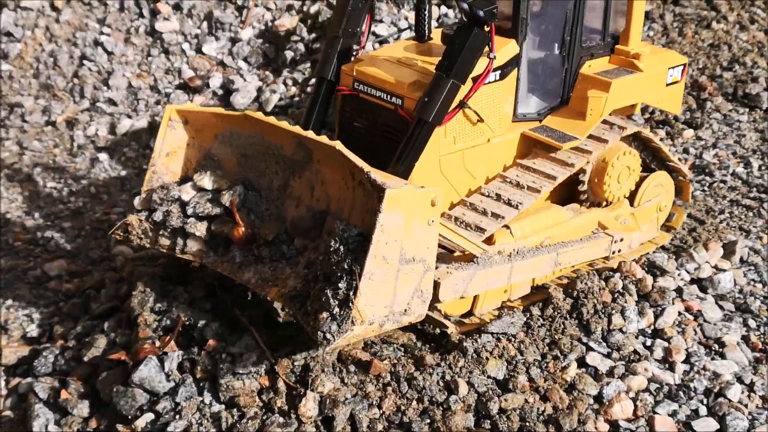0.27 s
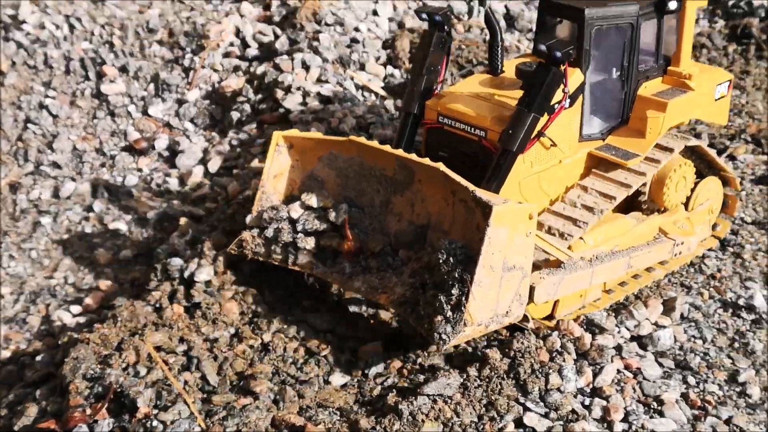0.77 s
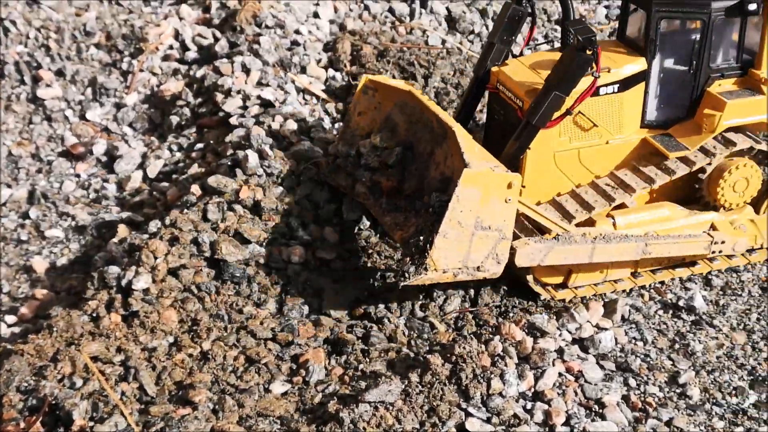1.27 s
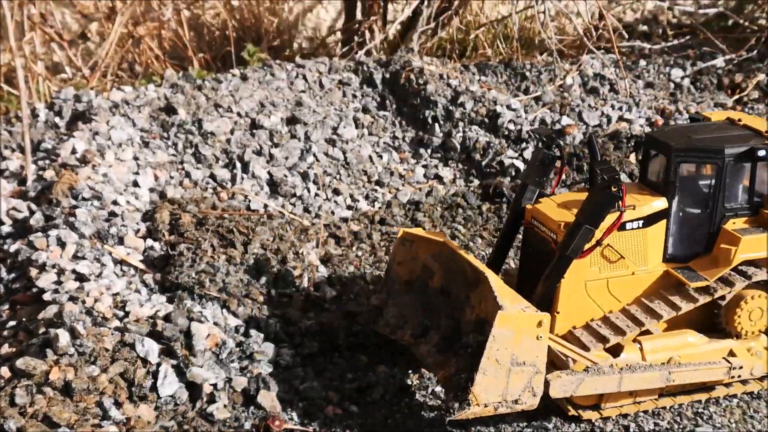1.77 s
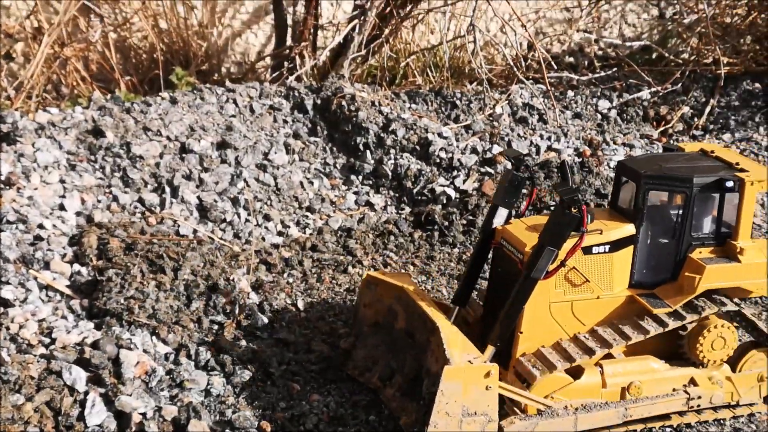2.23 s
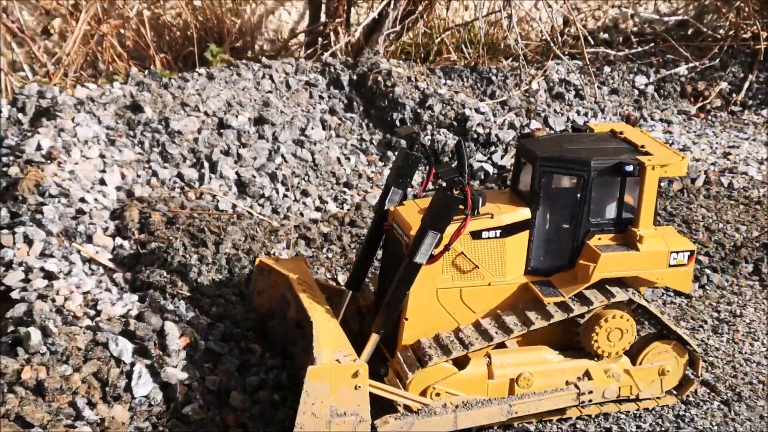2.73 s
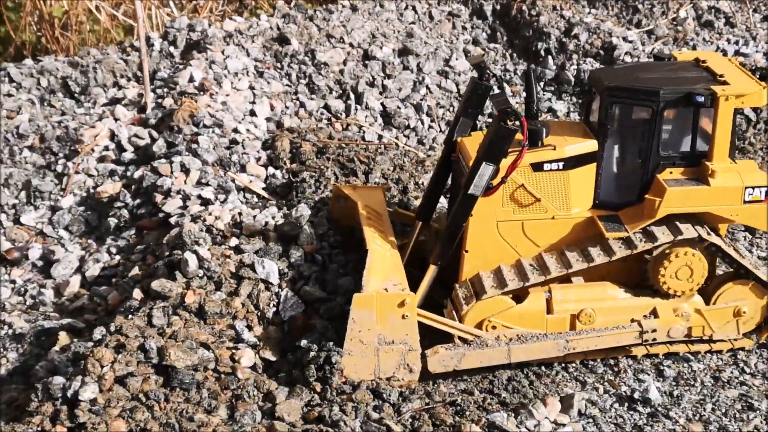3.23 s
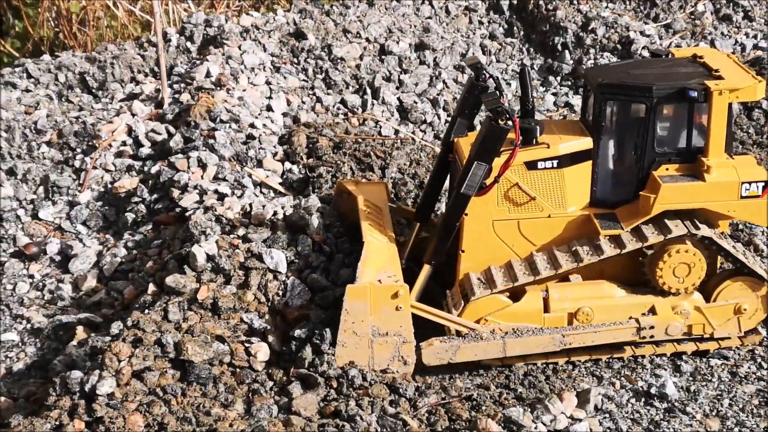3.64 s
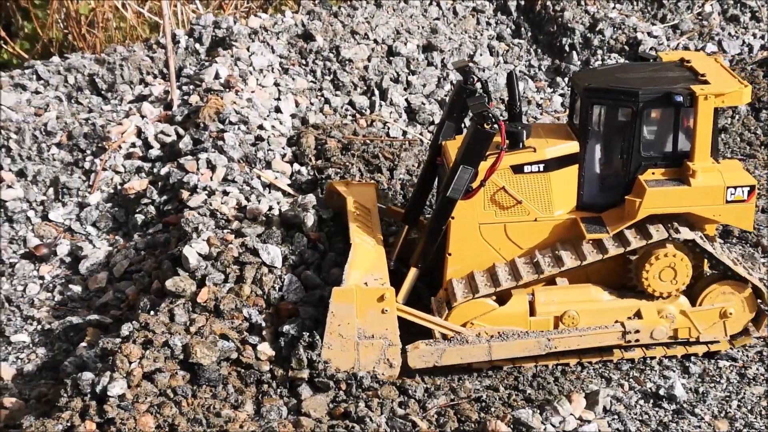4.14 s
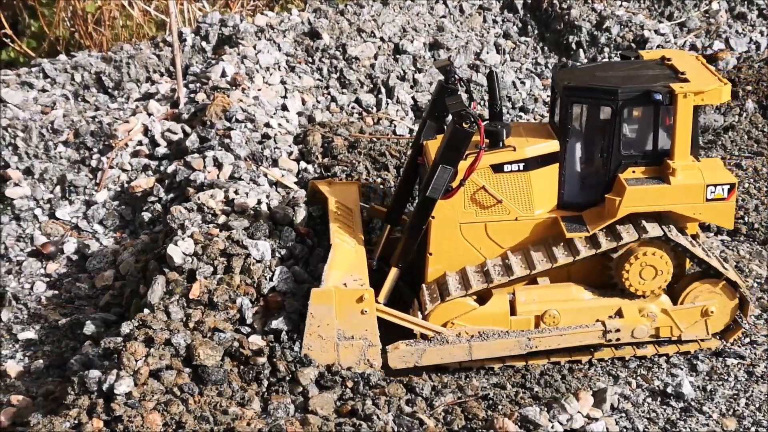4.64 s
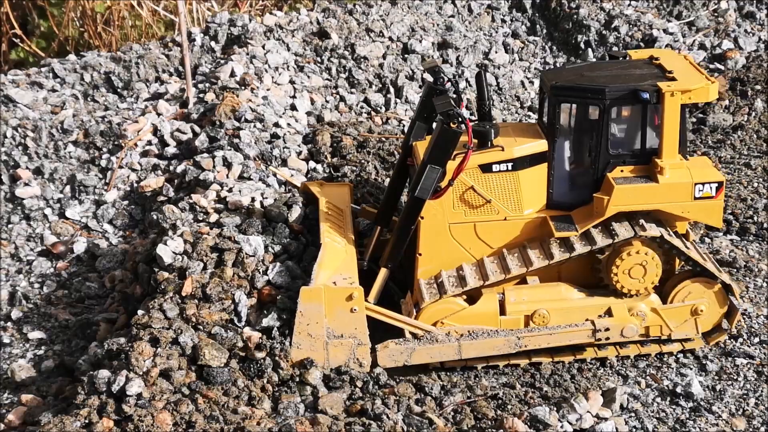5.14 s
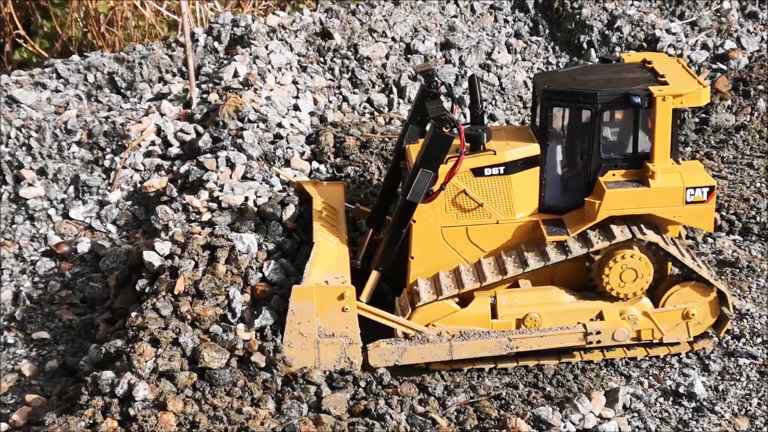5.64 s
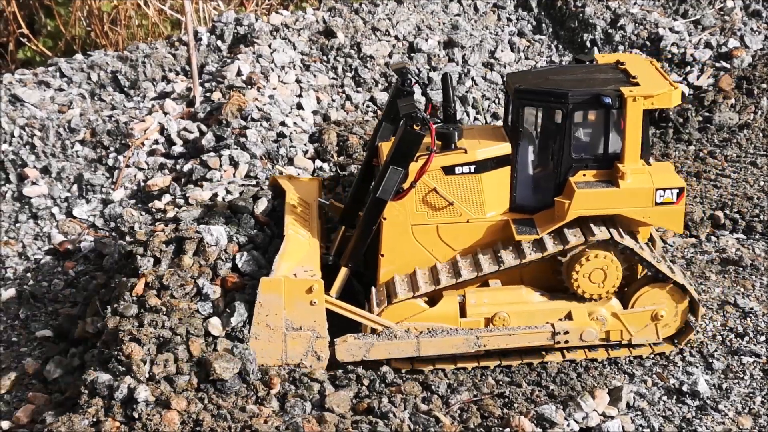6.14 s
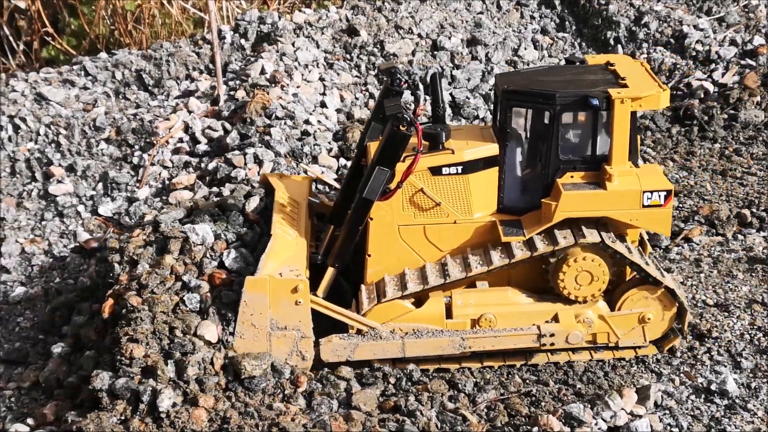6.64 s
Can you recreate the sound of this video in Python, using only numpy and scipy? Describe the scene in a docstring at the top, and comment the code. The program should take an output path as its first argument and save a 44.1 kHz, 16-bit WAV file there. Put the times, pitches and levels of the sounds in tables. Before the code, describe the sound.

Close outdoor gravel crunching under a toy-sized electric bulldozer: high gear whine, a hurried fast-forward passage, then grinding, stone clicks and metallic blade knocks.

```python
"""A small electric model bulldozer shoves gravel outdoors, close to a handheld pair of microphones.
Hiss and short decaying tones make the gravel; noise bursts with ringing tones make clicks, knocks and thuds.
Wavering tones and narrow noise make the gears; behind lie low noise for wind and a far engine hum.
There are three stretches; the middle one sounds four times too fast, after a short silence,
with the far hum raised to four times its pitch."""
import sys
import numpy as np
from scipy import signal
from scipy.fft import rfft, irfft, next_fast_len
from scipy.io import wavfile
from scipy.ndimage import uniform_filter1d

SR = 44100
rng = np.random.default_rng(int(sys.argv[2]) if len(sys.argv) > 2 else 0)


def undo_db(level):
    """Turn decibels back into plain size, where 20 dB means ten times bigger."""
    steps = np.asarray(level, float) / 20
    return 10 ** steps


def pcm_store(signal):
    """Save signal as 16-bit PCM."""
    levels = np.round(np.clip(np.atleast_2d(signal), -1, 1) * 32767)
    wavfile.write(sys.argv[1], SR, levels.astype(np.int16).T)


N = 304290
TIME_S = np.arange(N) / SR

# stretches of the scene: start_s, end_s, playing_speed
STRETCHES = [(0, .607, 1), (.64, 3.512, 4), (3.512, 6.9, 1)]
# work of the machine, one table per stretch: time_s, stone_rattle_db, track_thud_db
WORK = [
    [(0.0, -50, -74), (0.296, -50, -65), (0.45, -50.5, -68), (0.568, -49.5, -65.5), (0.605, -48.5, -64)],
    [(0.64, -56.5, -55.5), (0.87, -67, -62), (1.04, -57.5, -56.5), (1.22, -63.5, -62.5), (1.45, -57, -60),
     (1.69, -65, -61.5), (1.91, -62.5, -62.5), (2.09, -66.5, -64.5), (2.31, -70.5, -68.5),
     (2.38, -55, -54.5), (2.53, -47.5, -56.5), (2.61, -55.5, -54.5), (2.75, -52.5, -57), (3.15, -56, -58),
     (3.46, -54.5, -51), (3.51, -59, -56)],
    [(3.52, -53.5, -70.5), (3.65, -51.5, -72), (3.86, -57.5, -67.5), (3.97, -63, -71.5),
     (4.21, -63.5, -74.5), (4.49, -55.5, -65.5), (4.75, -57.5, -71.5), (4.93, -53, -66), (5.07, -53, -64),
     (5.11, -48, -62.5), (5.27, -49, -65), (5.37, -49, -56), (5.51, -51, -64), (5.57, -42, -50.5),
     (5.7, -43, -60), (5.76, -57, -69.5), (5.95, -55.5, -71.5), (6.09, -55.5, -63), (6.38, -56.5, -67.5),
     (6.9, -54, -67.5)],
]
# relative colour of gravel and rumble, one table per stretch: pitch_hz, density_db
COLOUR = [
    [(15, -35), (25, 1), (111, -17), (326, -27), (545, -28), (1070, -20.5), (1190, -19.5), (2410, -14.5),
     (3720, -18), (4080, -9), (4610, -23), (7920, -16), (12200, -32), (14800, -33), (16000, -53)],
    [(15, -47), (25, -8.5), (96, -3.5), (144, 3.5), (179, -7), (307, -11), (560, -9.5), (950, -16),
     (1870, -23), (2400, -22), (3400, -18), (4820, -17.5), (7420, -10), (15800, -19)],
    [(15, -54), (25, 8), (44, -8), (69, -11.5), (146, -10), (257, -19.5), (404, -23), (475, -30.5),
     (637, -23), (1210, -20.5), (1670, -13), (3300, -17), (4400, -24), (5140, -20), (9020, -17),
     (10600, -31.5), (15000, -40.5)],
]
# stereo width, one table per stretch: pitch_hz, side_minus_mid_db
WIDTH = [
    [(60, -29), (110, -11), (200, -13), (380, 1), (700, -3), (1290, -5), (2380, -5), (4400, -0.5),
     (8120, 0.5), (15000, -2)],
    [(60, -38), (110, -55), (200, -20), (380, -14), (700, -14.5), (1290, -4.5), (2380, 1.5), (4400, -5.5),
     (8120, -3.5), (15000, -0.5)],
    [(60, -26), (110, -11.5), (200, -12.5), (380, -2), (700, -0.5), (1290, -6.5), (2380, -0.5), (4400, 0.5),
     (8120, -1.5), (15000, -2)],
]
# left minus right far up in the treble, one per stretch: lean_db
TREBLE_LEAN_DB = [1, 2.2, 2.1]
# rattle, scrape, thud and fizz of the gravel: low_hz, high_hz, grains_per_s, scatter_db,
# grain_share_db (over the hiss, before the rest and shove offsets), ring_s, flicker_db, flicker_per_s
GRAVEL_LAYERS = [(3500, 9700, 1500, 4, -4, .006, 1.5, 20), (1000, 3500, 600, 3, -5, .012, 1.5, 25),
                 (250, 1000, 300, 2.5, -8, .02, 2, 35), (9700, 16500, 1500, 4, -5, .004, 2, 15)]
# shoves, when gravel gives way abruptly: start_s, end_s, rise_db (before SHOVE_SHARES)
SHOVES = [(0.35, 0.426, 3.5), (0.816, 0.856, 4.5), (1.027, 1.046, 4), (1.112, 1.138, 6.5),
          (1.224, 1.26, 5.5), (1.298, 1.389, 4), (1.532, 1.587, 3.5), (1.987, 2.051, 8.5),
          (2.26, 2.32, 6.5), (2.359, 2.462, 5.5), (2.492, 2.534, 3.5), (2.582, 2.655, 7),
          (2.718, 2.834, 3.5), (2.867, 2.955, 4), (3.384, 3.403, 4.5), (3.454, 3.5, 6), (4.65, 4.738, 4.5),
          (4.28, 4.416, 3.5), (5.098, 5.166, 4.5), (5.19, 5.246, 4), (5.252, 5.416, 4), (5.507, 5.725, 0.5),
          (6.27, 6.352, 3.5)]
# fraction of a shove's dB that reaches rattle, scrape, thud and fizz
SHOVE_SHARES = [0.85, 0.25, 0.057, 0.98]
# place of the scrape level between thud (0) and rattle (1), one per stretch
SCRAPE_RATTLE_SHARE = [0.39, 0.04, 0.5]
# scrape over that place, one per stretch: offset_db
SCRAPE_OVER_DB = [0, -10, 3.5]
# fizz change per dB of rattle, one per stretch
FIZZ_SLOPE = [0.73, 1.34, 0.67]
# fizz at the usual rattle with the gearbox at rest, one per stretch: level_db
FIZZ_DB = [-62, -55, -80]
# scattered faint ticks: ticks_per_s, scatter_db, ring_s, over_rattle_db
TICKS = (150, 3.5, .003, -12.5)
# stones clicking: time_s, peak_db, centre_hz
STONES = [(0.3636, -18, 7400), (0.385, -29, 5530), (0.396, -29, 5300), (0.7607, -33.5, 4680),
          (0.7665, -32.5, 7460), (0.9263, -42, 4060), (1.0286, -36, 11000), (1.1258, -36, 7250),
          (1.3254, -37.5, 6940), (1.5359, -37, 11300), (1.6596, -39.5, 7800), (1.808, -43, 7600),
          (1.8487, -47, 5600), (1.9829, -46, 3900), (2.0083, -35, 7600), (2.042, -44.5, 4300),
          (2.2702, -41, 9150), (2.3655, -27.5, 8900), (2.3984, -43, 7460), (2.591, -32, 7700),
          (2.6876, -45, 7000), (2.7337, -35.5, 11000), (2.762, -34, 9200), (2.833, -41, 10100),
          (2.92, -34, 9000), (2.9023, -43, 8000), (3.0165, -35.5, 10200), (3.0999, -35, 7450),
          (3.2146, -36.5, 6930), (3.4401, -33.5, 5450), (3.458, -44, 7750), (3.475, -53, 10700),
          (4.3221, -35, 7500), (4.6598, -40, 3300), (5.0459, -38.5, 7400), (5.0913, -32.5, 3480),
          (5.119, -33, 5150), (5.1996, -33, 7600), (5.138, -31, 6150), (5.176, -40, 4570),
          (5.232, -29, 6600), (5.2574, -30, 8200), (5.275, -41, 7000), (5.3172, -37, 6460),
          (5.335, -29, 6840), (5.352, -32, 6100), (5.371, -33, 7000), (5.535, -39, 3050),
          (5.546, -32, 7000), (5.638, -29, 5500), (5.2984, -37, 6500), (5.602, -29, 3360),
          (5.6955, -23, 5130), (5.9828, -35, 9030), (6.1015, -48, 2750), (6.3689, -33.5, 7460),
          (6.7466, -32.5, 5720)]
# single pebbles snapping, very short: time_s, peak_db, centre_hz
SNAPS = [(2.3808, -36, 9100), (2.4125, -31, 8960), (2.4957, -32, 7350), (2.5087, -24, 11900),
         (2.516, -28, 12900), (2.5229, -27, 11000), (2.5303, -26, 8660), (2.544, -39, 10600),
         (2.5515, -32, 11400), (2.6197, -26.5, 9000), (5.1158, -27, 6500), (3.139, -31, 12700),
         (3.1448, -31, 12900), (3.162, -37, 12500), (3.364, -37, 8950), (6.2123, -38, 7340),
         (6.2632, -28, 7100), (6.3021, -32, 7800), (6.432, -42, 3970), (6.4667, -32.5, 6320),
         (6.5296, -40, 7000), (6.829, -35.5, 8450), (6.8433, -31.5, 7700)]
# knocks on blade and frame, and in the fast stretch short thuds of the tracks: time_s, peak_db, centre_hz
KNOCKS_AND_THUDS = [(0.363, -32, 2060), (0.583, -42, 2200), (0.762, -35.5, 1910), (2.375, -49, 503),
                    (2.431, -39.5, 540), (2.514, -39.5, 526), (2.527, -40.5, 890), (2.609, -33.5, 540),
                    (2.664, -46.5, 640), (2.72, -48, 682), (2.82, -48, 575), (2.89, -45, 475),
                    (2.94, -48.5, 927), (3.08, -47.5, 560), (3.235, -40.5, 640), (3.252, -42, 500),
                    (3.4, -37.5, 737), (3.437, -34, 538), (3.878, -50, 680), (3.9, -47, 1510),
                    (3.91, -42.5, 664), (5.088, -41, 1600), (5.337, -30.5, 1820), (5.35, -35, 1440),
                    (5.369, -37, 1320), (5.387, -39, 1440), (5.471, -36.5, 1420), (5.491, -41, 1560),
                    (5.535, -35.5, 1470), (5.517, -32.5, 1560), (5.695, -37, 740), (5.602, -38, 1370),
                    (5.984, -44.5, 744), (6.102, -28.5, 1850), (6.107, -30, 656), (6.111, -33, 1900),
                    (6.119, -34, 640), (6.745, -38.5, 1120)]
# ringing modes of the blade: pitch_hz, relative_db, t60_s
BLADE_MODES = [(640, -3.5, 0.082), (1112, 5, 0.03), (1420, 3, 0.042), (1930, -3, 0.056), (2750, -3, 0.03)]
# the blade sings while it drags over stone: start_s, end_s, centre_hz, width_hz, relative_db
SINGING = [(0.784, 0.876, 5220, 262, -67.5), (4.65, 4.73, 3470, 250, -61), (5.093, 5.165, 5000, 300, -53),
           (5.34, 5.399, 1390, 200, -58), (5.6, 5.645, 1400, 200, -53), (5.601, 5.652, 3330, 450, -49),
           (5.689, 5.731, 5230, 500, -46), (6.009, 6.048, 660, 120, -62)]
# dull thumps through the ground: time_s, peak_db, centre_hz
THUMPS = [(0.582, -33.5, 154), (1.0, -40, 85.5), (2.042, -39.5, 121), (2.648, -35.5, 62.4),
          (2.768, -38, 141), (5.387, -36.5, 147)]
# gear whine while the blade lifts: time_s, pitch_hz, level_db
LIFT = [(0.0, 3925, -52), (0.07, 3885, -49), (0.145, 3935, -49), (0.195, 3870, -51), (0.24, 3842, -52),
        (0.28, 3885, -48.5), (0.335, 3970, -52), (0.39, 3925, -51), (0.49, 3950, -50), (0.53, 3885, -48),
        (0.565, 3880, -51), (0.58, 3760, -59), (0.605, 3720, -61)]
# partials of that whine: pitch_multiple, relative_db
LIFT_PARTIALS = [(1, 0), (.976, -11), (1.025, -11), (1.055, -14), (2, -14)]
# thin drive whine of the fast stretch, one table per passage: time_s, level_db
DRIVE = [
    [(0.8, -75), (1.03, -82), (1.9, -94)],
    [(2.095, -80), (2.14, -65), (2.165, -76), (2.2, -67), (2.265, -74), (2.29, -65), (2.36, -70)],
]
# brief squeals of a slowing gear, one table each: time_s, pitch_hz, level_db
SQUEALS = [
    [(.642, 13400, -60), (.71, 12400, -62)],
    [(3.515, 6450, -63), (3.6, 5850, -59), (3.65, 5550, -63)],
]
# gearbox ring under load: start_s, end_s, relative_db (at the start), fade_db (by the end)
GEARBOX = [(3.52, 3.916, -43, 25), (5.06, 6.122, -50, 7)]
# resonances of the gear housing while the blade lifts: centre_hz, width_hz, relative_db
HOUSING_MODES = [(2310, 400, -14.5), (5030, 80, -11.5), (6770, 290, -1.5), (7700, 1000, -1),
                 (7660, 160, -4), (9030, 460, -7)]
# course of the housing resonances: time_s, relative_db
HOUSING_COURSE = [(0.0, -52), (0.2, -55), (0.605, -52)]
# wind on the microphones, one table per stretch: time_s, level_db (at the usual thud)
WIND = [
    [(0.0, -48.5), (0.35, -48.5), (0.605, -48.5)],
    [(0.64, -53), (1.2, -57), (2.0, -55), (2.2, -56.5), (2.67, -49.5), (3.17, -56.5), (3.51, -59)],
    [(3.52, -49.5), (4.07, -55), (4.9, -55), (5.73, -48.5), (5.83, -54), (6.0, -50), (6.9, -55)],
]
# far engine hum: pitch_hz (at normal speed), level_db, waver_db
HUM = [(37.3, -57.5, 2.8), (49.2, -70, 3.5), (57.5, -74, 2.5), (69, -70.5, 4), (87, -70.5, 4),
       (111.7, -62.8, 1.6), (122.5, -73.5, 2.5)]

USUAL_RATTLE_DB, USUAL_THUD_DB = -55, -62


def work_levels(k, t):
    """Levels of rattle, scrape, thud and fizz in dB, driven by the work of the machine and gearbox load."""
    rattle, thud = curve(WORK[k], t)
    share = SCRAPE_RATTLE_SHARE[k]
    scrape = SCRAPE_OVER_DB[k] + share * rattle + (1 - share) * thud
    load = sum(gearbox_load(t, start, end) for start, end, *_ in GEARBOX)
    fizz = FIZZ_DB[k] + FIZZ_SLOPE[k] * (rattle - USUAL_RATTLE_DB) + 17 * load  # dB
    return rattle, scrape, thud, fizz


def shove_rise(t):
    """Abrupt rises in dB as gravel gives way, with slightly softened edges."""
    return uniform_filter1d(sum(db * (t > start) * (t < end) for start, end, db in SHOVES), size=200)


def grains(rate, scatter_db, ring_s, lo_hz, hi_hz, size):
    """Pebbles ring briefly at their own pitch and side, a few much louder; mid (rms 1) and side."""
    at, pitch, side, big = rng.random((int(rate * size / SR), 4)).T[:, :, None]
    k = np.arange(int(ring_s * SR))
    decay = np.exp(-np.log(1000) * k / len(k))
    loudness = undo_db(scatter_db * np.minimum(-np.log(big), 4))
    hz = lo_hz * (hi_hz / lo_hz) ** pitch
    ring = loudness * decay * np.sin(2 * np.pi * hz * k / SR)
    where = ((at * size).astype(int) + k).ravel()
    place = 3 ** .5 * (2 * side - 1)
    pair = np.array([np.bincount(where, (ring * weight).ravel(), size + len(k))[:size]
                     for weight in (1, place)])
    return pair / np.sqrt(np.mean(pair[0] ** 2))


def gravel(k, t):
    """Moving gravel: hiss plus ringing pebbles in four bands that jolt together, and faint ticks."""
    size, speed = len(t), STRETCHES[k][2]
    jolt_db = 0.86 * walk(30, size)
    shove_db = shove_rise(t)
    work_db = work_levels(k, t)
    out = np.zeros((2, size))
    for layer, db, reach in zip(GRAVEL_LAYERS, work_db, SHOVE_SHARES):
        lo_hz, hi_hz, rate, scatter_db, share_db, ring_s, flicker_db, flicker_rate = layer
        hiss = rng.standard_normal((2, size))
        pebbles = grains(rate, scatter_db, ring_s, lo_hz, hi_hz, size)
        # pebbles stand out more from the hiss during a shove
        pebble_db = share_db - 6.5 + 1.1651 * shove_db
        flicker = flicker_db * walk(flicker_rate, size)
        level = undo_db(db + reach * shove_db + jolt_db + flicker)
        out += level * band(hiss + undo_db(pebble_db) * pebbles, lo_hz, hi_hz, k)
    rate, scatter_db, ring_s, over_db = TICKS
    ticks = grains(rate, scatter_db, ring_s, 5000, 9000 if speed == 1 else 15000, size)
    return out + undo_db(work_db[0] + shove_db + over_db) * band(ticks, 4000, 16500, k)


def hits(rows, t60, width, unlike, rise_s, modes=(), ring_db=-6):
    """Each blow is a decaying noise burst round its centre plus the ring of the struck thing; mid peak as listed."""
    size = SR // 7
    out = np.zeros((2, N + size))
    t = np.arange(size) / SR
    shape = np.minimum(t / rise_s, 1) * np.exp(-np.log(1000) * t / t60)
    for s, db, hz in rows:
        a, b = rng.standard_normal((2, size))
        noise = np.array([a + unlike * b, a - unlike * b]) * shape
        edges = [hz / (1 + width), min(hz * (1 + width), .45 * SR)]
        burst = signal.sosfilt(signal.butter(1, edges, "band", fs=SR, output="sos"), noise)
        ring = np.zeros(size)
        # modes near the centre of the blow ring most; with no modes given, the centre itself rings
        for m_hz, m_db, m_t60 in modes or [(hz, 0, 2 * t60)]:
            level = undo_db(m_db - 13.7 * abs(np.log2(m_hz / hz)))
            ring += level * np.sin(2 * np.pi * m_hz * t) * np.exp(-np.log(1000) * t / m_t60)
        blow = burst / np.abs(burst.mean(axis=0)).max() + undo_db(ring_db) * ring / np.abs(ring).max()
        start = int(s * SR)
        out[:, start:start + size] += undo_db(db) * blow / np.abs(blow.mean(axis=0)).max()
    return out[:, :N]


def stone_clicks():
    """Stones click and pebbles snap: short bursts, each with a tone at its own centre."""
    clicks = hits(STONES, 0.011, width=0.34, unlike=0.93, rise_s=0.0025, ring_db=-5.5)
    return clicks + hits(SNAPS, .007, width=0.3, unlike=0.5, rise_s=0.0004, ring_db=-9)


def knocks_and_track_thuds():
    """Knocks on blade and frame ring the blade modes; track thuds of the fast stretch ring at their centre."""
    start, end, _ = STRETCHES[1]
    thuds = [row for row in KNOCKS_AND_THUDS if start < row[0] < end]
    knocks = [row for row in KNOCKS_AND_THUDS if row not in thuds]
    out = hits(knocks, 0.031, width=0.15, unlike=0.68, rise_s=0.00092, modes=BLADE_MODES, ring_db=-2.5)
    return out + hits(thuds, 0.043, width=0.4, unlike=0.5, rise_s=0.004, ring_db=-3)


def ground_thumps():
    """Low blows through the ground, in which the tone far outweighs the noise."""
    return hits(THUMPS, 0.039, width=0.19, unlike=0.97, rise_s=0.013, ring_db=17.0)


def ringing(rows, modes):
    """Noise in narrow resonances, following the last column of rows in dB."""
    span = (TIME_S > rows[0][0]) & (TIME_S < rows[-1][0])
    out = np.zeros((2, N))
    for hz, width, db in modes:
        noise = rng.standard_normal((2, span.sum())) * np.sqrt(SR / width)
        resonance = signal.butter(2, [hz - width / 2, hz + width / 2], "band", fs=SR, output="sos")
        out[:, span] += undo_db(db) * signal.sosfilt(resonance, noise)
    return out * undo_db(curve(rows, TIME_S)[-1])


def blade_singing():
    """Dragging over stone makes the blade sing: short spells of narrow noise."""
    return sum(ringing([(start, db), (end, db)], [(hz, width, 0)]) for start, end, hz, width, db in SINGING)


def whine(rows, partials, wobble, rough_db, rate, hz=None):
    """A gear tone whose pitch wobbles and whose level flutters, differently at each microphone."""
    span = (TIME_S > rows[0][0]) & (TIME_S < rows[-1][0])
    *pitch, db = curve(rows, TIME_S[span])
    size, out = span.sum(), np.zeros((2, N))
    phase = 2 * np.pi * np.cumsum((hz or pitch[0]) * (1 + wobble * walk(rate, size))) / SR
    tone = [sum(undo_db(p_db + rough_db * walk(rate, size)) * np.sin(m * phase + turn) for m, p_db in partials)
            for turn in (0, 1)]
    fades = signal.windows.tukey(size, 800 / size)
    out[:, span] = np.sqrt(2) * fades * undo_db(db) * np.array(tone)
    return out


def gear_whines():
    """Gears turning: the blade lift, the thin fast drive and the squeals of a slowing gear."""
    out = whine(LIFT, LIFT_PARTIALS, wobble=.0008, rough_db=1.5, rate=40)
    for rows in DRIVE:
        out += whine(rows, [(1, 0)], wobble=.0003, rough_db=1.5, rate=40, hz=9906)
    for rows in SQUEALS:
        out += whine(rows, [(1, 0)], wobble=.009, rough_db=4, rate=150)
    return out


def gearbox_load(t, start, end):
    """0 at rest, rising over 0.12 s to 1 while the gearbox is loaded."""
    return np.clip((t - start) / 0.12, 0, 1) * (t < end)


def gearbox_ring():
    """The loaded gearbox rings as narrow noise that fades steadily by fade_db, then stops."""
    out = np.zeros((2, N))
    for start, end, db, fade_db in GEARBOX:
        ring = ringing([(start, db), (end, db - fade_db)], [(9280, 500, -3)])
        out += gearbox_load(TIME_S, start, end) * ring
    return out


def housing_ring():
    """Blurred ringing of the gear housing while the blade lifts."""
    return ringing(HOUSING_COURSE, HOUSING_MODES)


def wind_rumble(k, t):
    """Gusty low noise of wind on the microphones; the ground shakes with the track thud too."""
    thud = curve(WORK[k], t)[1]
    gust_db = 2.5 * walk(11.93, len(t))
    rumble_db = curve(WIND[k], t)[0] + 0.42 * (thud - USUAL_THUD_DB) + gust_db
    return undo_db(rumble_db) * band(rng.standard_normal((2, len(t))), 20, 250, k)


def engine_hum(speed, size):
    """A far engine: low tones wavering in pitch and level, with pitch multiplied by the playing speed."""
    out = np.zeros(size)
    for hz, db, waver_db in HUM:
        wobble = 1 + .004 * walk(4, size)
        level = np.sqrt(2) * undo_db(db + waver_db * walk(14, size))
        out += level * np.sin(2 * np.pi * np.cumsum(speed * hz * wobble) / SR)
    return out


def microphone_hiss():
    """Self-noise of each microphone, tilted to the treble by differencing."""
    return undo_db(-73) * np.diff(rng.standard_normal((2, N + 1)))


def microphone_top(blows):
    """The microphones dull the blows above 9900 Hz."""
    return signal.sosfilt(signal.butter(6, 9900, fs=SR, output="sos"), blows)


def band(pair, lo_hz, hi_hz, k):
    """Mid and side given the colour and width of stretch k in one band; left and right, mid rms 1."""
    size = next_fast_len(pair.shape[1])
    hz = np.arange(size // 2 + 1) * SR / size
    edges = (1 + (lo_hz / (hz + 1)) ** 16) * (1 + (hz / hi_hz) ** 16)
    mid, side = rfft(pair, size) * undo_db(over_hz(COLOUR[k], hz)) / np.sqrt(edges)
    side = side * undo_db(over_hz(WIDTH[k], hz))
    lean = undo_db(TREBLE_LEAN_DB[k] * hz / (hz + 1500) / 2)
    out = irfft([(mid + side) * lean, (mid - side) / lean], size)[:, :pair.shape[1]]
    return out / np.sqrt(np.mean(out.mean(axis=0) ** 2))


def walk(rate, size):
    """Random levels held 1 / rate s and smoothed twice; spread near 1."""
    k = int(SR / rate)
    held = np.repeat(rng.standard_normal(size // k + 1), k)
    return 1.415 * uniform_filter1d(uniform_filter1d(held, k), k)[:size]


def curve(rows, t):
    """Columns of a table, joined by straight lines in time."""
    s, *columns = np.transpose(rows)
    return [np.interp(t, s, c) for c in columns]


def over_hz(rows, hz):
    """Levels of a pitch_hz, level_db table read on a log-frequency axis."""
    table_hz, db = np.transpose(rows)
    return np.interp(np.log(hz + 1), np.log(table_hz), db)


def scene():
    """The three stretches in time, with whines, clicks, knocks and thuds on top."""
    out, heard = np.zeros((2, N)), np.zeros(N)
    blows = stone_clicks() + knocks_and_track_thuds() + ground_thumps()
    # in the fast stretch the microphones' upper edge lies above hearing
    dull = microphone_top(blows)
    for k, (start, end, speed) in enumerate(STRETCHES):
        span = (TIME_S >= start) & (TIME_S < end)
        t = TIME_S[span]
        out[:, span] = gravel(k, t) + wind_rumble(k, t) + engine_hum(speed, len(t))
        out[:, span] += (dull if speed == 1 else blows)[:, span]
        heard[span] = 1
    out += blade_singing() + gear_whines() + gearbox_ring() + housing_ring() + microphone_hiss()
    # the stretches at normal speed end at 15200 Hz
    slow = (TIME_S < STRETCHES[0][1]) | (TIME_S > STRETCHES[2][0])
    slow_top = signal.ellip(8, .2, 60, 15200, fs=SR, output="sos")
    out[:, slow] = signal.sosfilt(slow_top, out)[:, slow]
    return out * uniform_filter1d(heard, size=60, mode="nearest")


def top_cut(x):
    """Nothing passes above the cut-off."""
    return signal.sosfilt(signal.butter(12, 16480, fs=SR, output="sos"), x)


def record(dry):
    """The top is cut steeply at 15900 Hz."""
    mix = signal.sosfilt(signal.ellip(8, .2, 70, 15900, fs=SR, output="sos"), dry)
    return top_cut(mix)


dry = scene()
out = record(dry)
pcm_store(out)
```